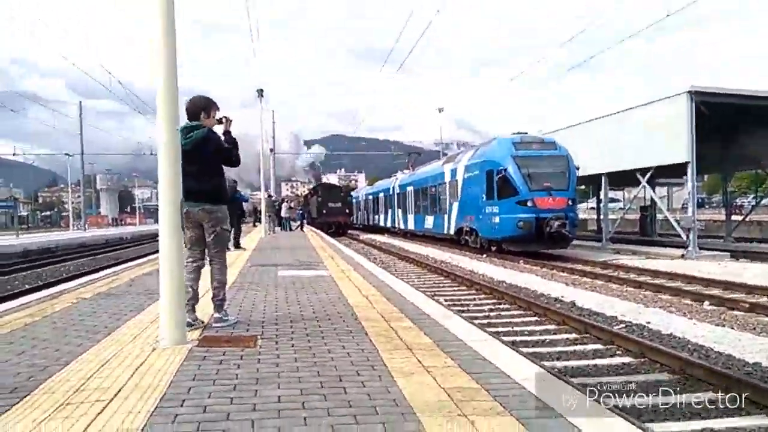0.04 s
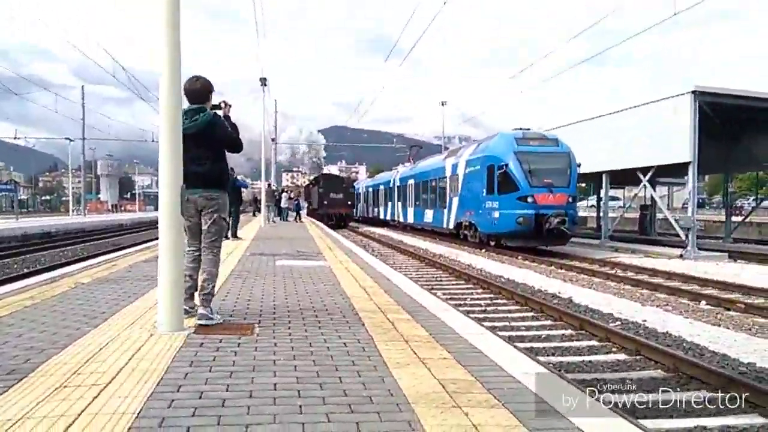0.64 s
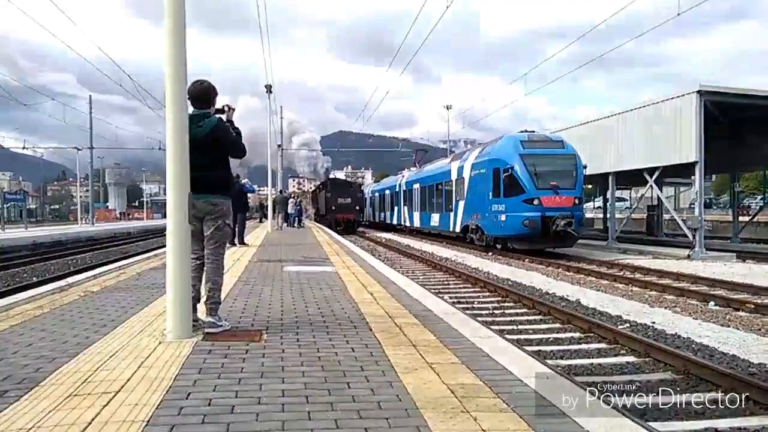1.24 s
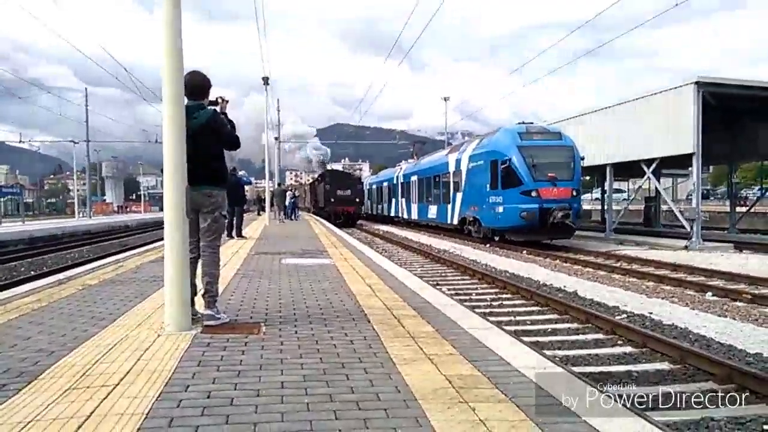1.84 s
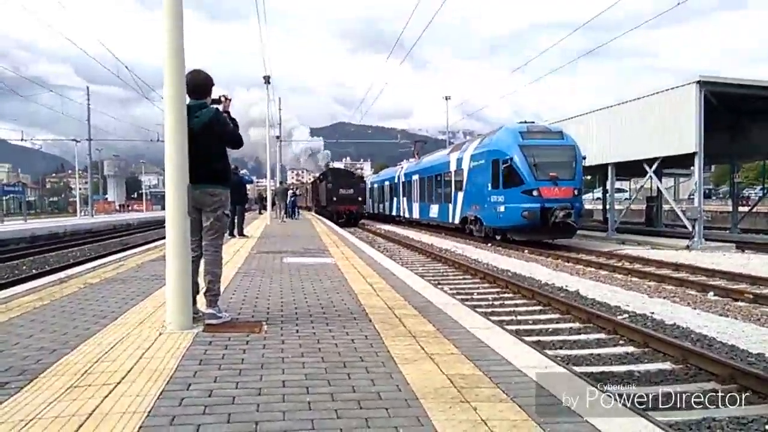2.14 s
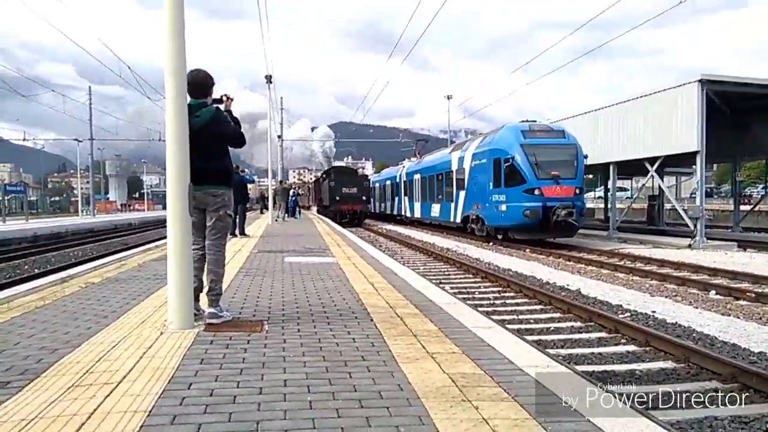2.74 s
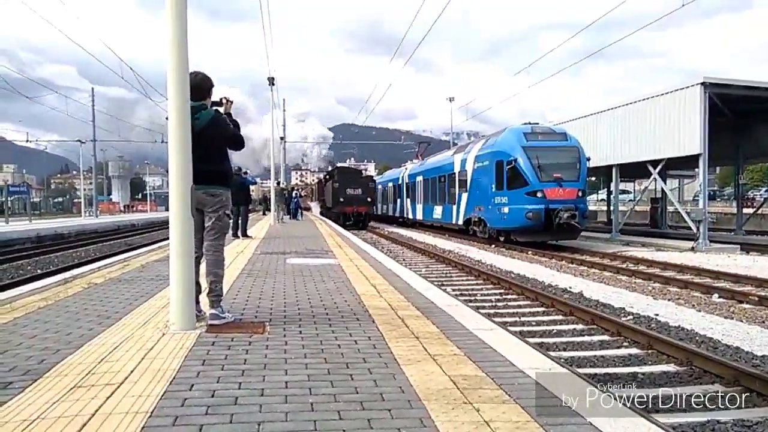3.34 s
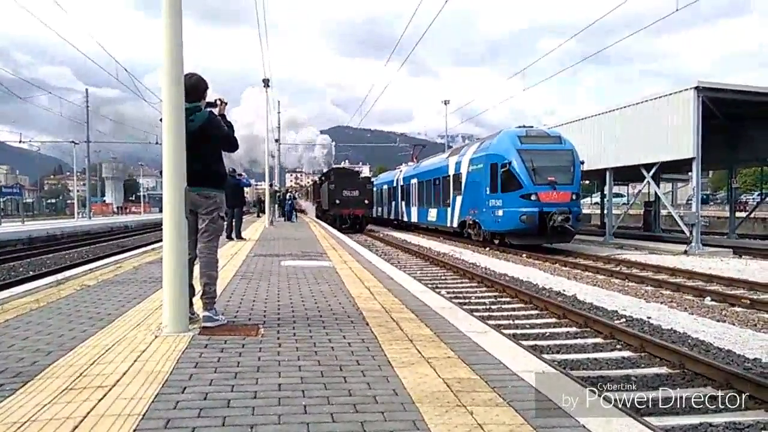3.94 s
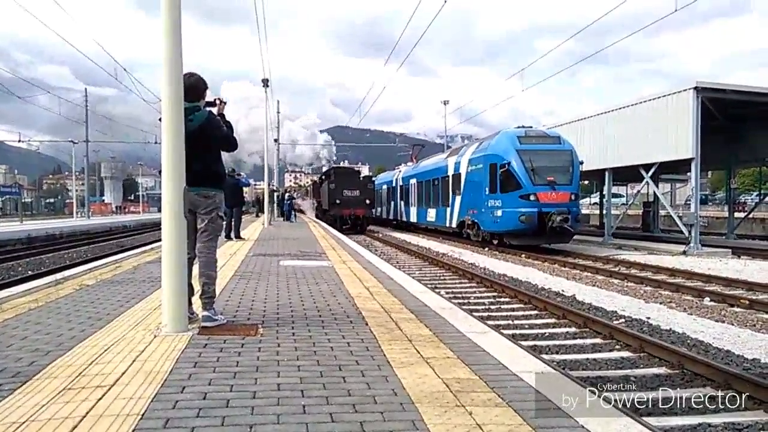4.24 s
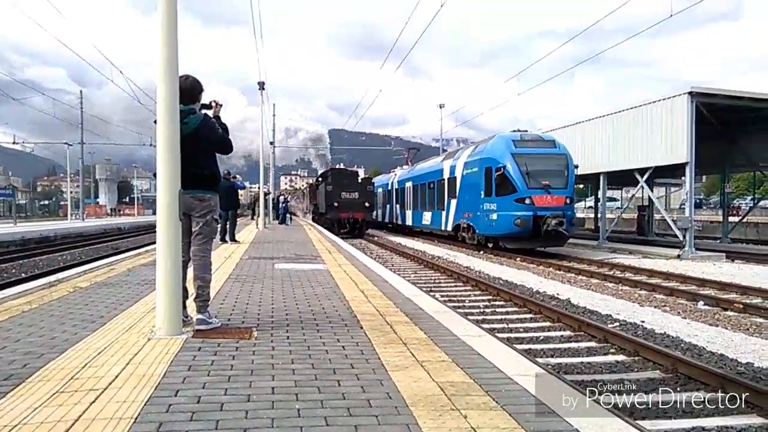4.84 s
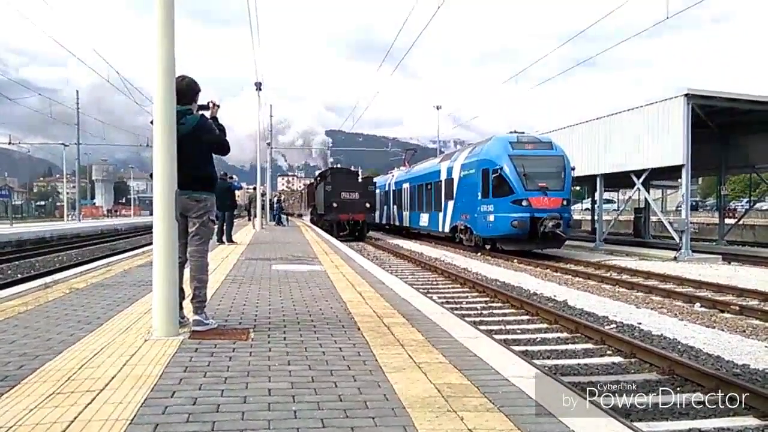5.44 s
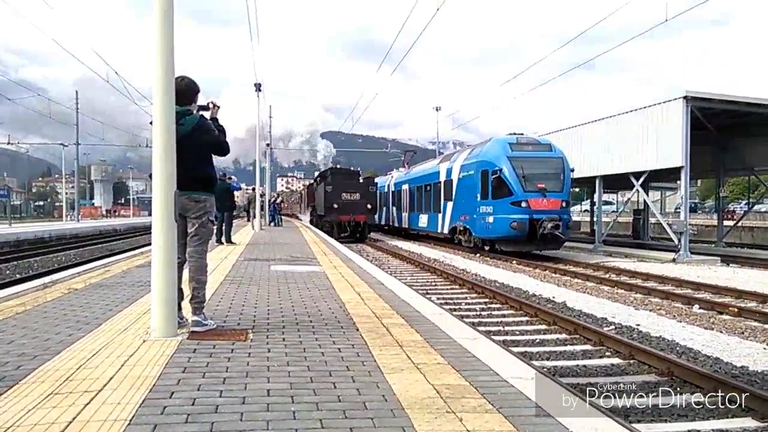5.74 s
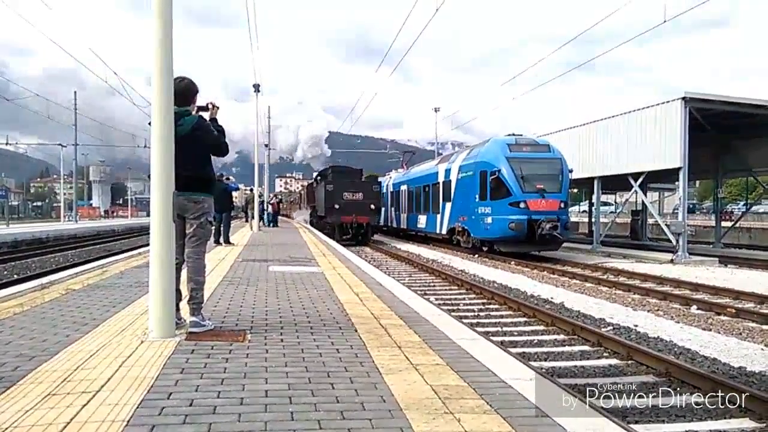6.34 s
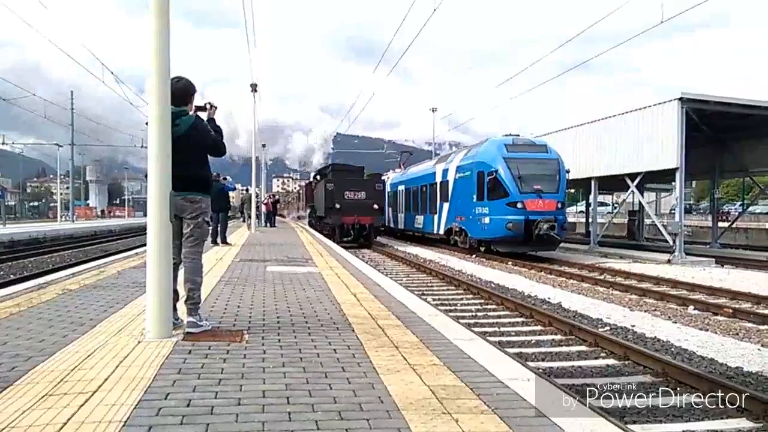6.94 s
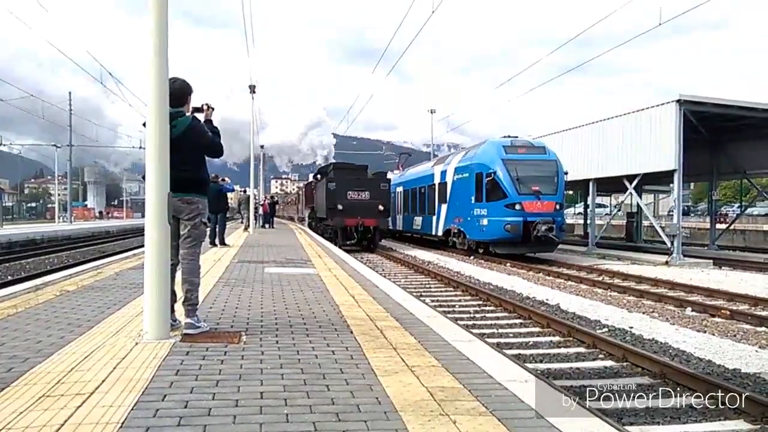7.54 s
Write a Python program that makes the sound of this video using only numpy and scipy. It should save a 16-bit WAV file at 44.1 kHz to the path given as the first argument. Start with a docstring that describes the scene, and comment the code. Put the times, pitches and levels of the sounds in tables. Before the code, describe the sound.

A steam locomotive chuffs some way off, its booming, hissing beats slowly quickening over a low rumble of wheels.

```python
"""Steam locomotive pulling along a platform

Some way off, the engine's beat slowly quickens. Each puff of exhaust booms in the chimney, barks,
and ends in a hiss of steam that dies away over the station. Steam spurts from the cylinders,
sliding parts scrape, rods clank and wheels rumble. Behind it the yard hums; close by, something
ticks. A limiter (an automatic volume control) flattens the loudest beats."""
import sys
import numpy as np
from scipy import signal
from scipy.fft import rfft, irfft, next_fast_len
from scipy.io import wavfile
from scipy.ndimage import uniform_filter1d, minimum_filter1d

SR = 44100
rng = np.random.default_rng(int(sys.argv[2]) if len(sys.argv) > 2 else 0)


def store_wav(level_fs):
    """Save 16-bit WAV to argv[1]."""
    pcm = np.round(np.clip(np.atleast_2d(level_fs), -1, 1) * 32767)
    wavfile.write(sys.argv[1], SR, pcm.T.astype(np.int16))


N = 339129
TIME = np.arange(N) / SR

# exhaust beats, four to a wheel turn: (time [s], valve open [s], strength [dB],
# rasp compared with strength [dB], jet [dB], sizzle compared with jet [dB])
BEATS = [(0.015, .06, -34.6, -23, -63, -8), (0.514, .089, -33.0, -13.5, -63.3, -4.5),
         (1.015, .075, -28.8, -13.5, -60, -3.5), (1.464, .067, -29.6, -16.2, -56.6, -6.5),
         (1.918, .055, -32.2, -18.5, -61.7, -8), (2.384, .06, -29.0, -26, -57.7, -5),
         (2.815, .105, -29.3, -18, -52, -5.5), (3.23, .064, -29.1, -18, -48.5, -6.5),
         (3.635, .058, -31.1, -22.5, -61.3, -4.5), (4.062, .075, -29.3, -18.5, -55, -5),
         (4.449, .098, -28.3, -17.3, -53, -1.5), (4.832, .105, -29.4, -19.5, -48.5, -7),
         (5.213, .038, -29.0, -18, -55.2, -5.5), (5.602, .059, -29.0, -17.5, -51.3, -2.5),
         (5.963, .092, -28.3, -18.3, -50.7, -2), (6.337, .075, -27.4, -23, -48.5, -1.5),
         (6.675, .05, -29.2, -15, -56.3, -2), (7.046, .062, -27.7, -13.5, -47.7, -.5),
         (7.392, .08, -26.5, -16, -47.8, -1)]
# tone of the yard, the wheels and the jet's sizzle: (frequency [Hz], level [dB])
YARD_SPECTRUM = [(30, -2), (150, -2), (300, -7), (430, -4), (560, -10), (750, -8), (950, -16), (1700, -25),
                 (2400, -24), (4800, -31), (6500, -39), (8000, -54), (15000, -57)]
RUMBLE_SPECTRUM = [(15, -20), (30, -13), (45, -3), (57, 1), (80, -2), (105, -5), (150, -16), (230, -28),
                   (500, -45), (1500, -80)]
SIZZLE_SPECTRUM = [(2500, -30), (3600, -4), (4700, .5), (5400, 0), (6200, -4), (7000, -10.5), (7450, -22),
                   (7900, -39), (9000, -35), (10200, -58)]
# a faint, very high fizz with each beat: (frequency [Hz], level [dB])
FIZZ_SPECTRUM = [(4500, -20), (6000, -3), (7000, 0), (7900, -18), (9000, -11), (9700, -25), (10300, -46),
                 (11200, -35), (12000, -23), (13200, -44), (15000, -54)]
# the rolling rumble as the engine nears: (time [s], level [dB])
ROLLING_LEVELS = [(0.0, -58), (6.38, -50), (6.57, -47), (7.69, -50)]
# rumble under each of the four piston strokes of a turn: (level compared with strength [dB])
STROKE_DB = [-13.5, -17, -21, -18]
# short, high spits of steam: (time [s], length [s], level [dB])
STEAM_SPITS = [(0, .15, -68), (.525, .03, -67), (1.13, .27, -65), (3.24, .05, -59), (6.35, .06, -49.5)]

# A mode is a pitch at which something likes to ring. All are (pitch [Hz], width [Hz], level [dB]).
# steam slipping past the opening valve
SLIP_MODES = [(405, 70, 0), (500, 90, -9)]
# air in the chimney and the smokebox (the chamber below it), from low to high
THUMP_MODES = [(68, 34, 0), (110, 34, -1.5)]
BOOM_MODES = [(147, 34, -1.5), (175, 36, 0)]
RING_MODES = [(192, 26, 0)]
BARK_MODES = [(274, 28, 0), (350, 90, -4), (398, 50, -2), (428, 46, 1.5), (515, 110, -8)]
THROAT_MODES = [(625, 120, -6.5), (715, 70, -.5), (765, 64, 0), (845, 80, -7.5)]
RASP_MODES = [(1000, 110, -3), (1135, 110, 0), (1240, 110, -2), (1470, 260, -12.5)]
# the blast pipe, which aims the steam up the chimney
BLAST_PIPE_MODES = [(1600, 260, -3.5), (1960, 145, 2.3), (2190, 300, -.5), (2600, 260, .5),
                    (2980, 175, -1.5), (3480, 290, -1.2), (4050, 700, -7.5), (4700, 500, -10)]
# steam leaving the cylinders
SPIT_MODES = [(4500, 800, -3), (5500, 900, 0)]
LEAK_MODES = [(2550, 300, -14), (3590, 220, -2.5), (4050, 190, -3), (4400, 800, -7), (4670, 140, 0),
              (4860, 160, -2)]
# sliding metal parts
SCRAPE_MODES = [(1220, 200, -6), (1520, 160, -8), (1960, 90, 1), (2380, 260, 0), (2620, 140, -1),
                (2980, 140, -4)]
GRIND_MODES = [(425, 80, 0), (780, 140, 0), (960, 160, -2), (1200, 200, -6), (1500, 240, -10)]

# how each sound swells and fades: (lag [s], rise [s], fall [dB/s], echo tail [dB], tail fall [dB/s])
STROKE_SHAPE = (.015, .01, 160, -22, 60)
SLIP_SHAPE = (-.012, .006, 260, -30, 120)
BOOM_SHAPE = (.009, .0055, 180, -19.5, 58)
RING_SHAPE = (.055, .015, 130, -17, 60)
BARK_SHAPE = (.007, .009, 150, -15, 52)
THROAT_SHAPE = (.018, .009, 130, -16, 38)
RASP_SHAPE = (.029, .008, 140, -14.5, 36)
CREST_SHAPE = (.033, .006, 330, -40, 200)
HISS_SHAPE = (.003, .016, 98, -16.5, 60)
SIZZLE_SHAPE = (.012, .015, 77, -14.5, 58)
FIZZ_SHAPE = (.024, .011, 190, -17, 60)
SCRAPE_SHAPE = (0., .008, 150, -20, 60)
LEAK_SHAPE = (0., .01, 150, -24, 65)

# chirping ticks close by: (time [s], peak [dB], first pitch [Hz], last pitch [Hz], decay [s])
NEAR_TICKS = [(.1327, -20.5, 6100, 4000, .0008), (.1328, -31, 2900, 2100, .0005),
              (1.6895, -35.5, 4700, 6000, .0018)]
# the scrape after each of the four beats of a turn: (level [dB])
SCRAPE_DB = [-77, -68, -66, -65]
# the cylinder's leak on each wheel turn: (level [dB])
LEAK_DB = [-69.5, -57.5, -52, -60.5, -64]
# knocks of rods and couplings: (time [s], level [dB], brightness [dB per octave])
ROD_KNOCKS = [(1.053, -43, -3), (1.353, -39, -3), (1.477, -46, 3), (1.983, -49, 0), (2.076, -50, 5),
              (2.431, -33, -12), (4.85, -44, 0), (5.25, -44, -4), (6.17, -39, -12), (6.75, -40, -4)]
# tones of a struck rod: (pitch [Hz], level [dB], time to fade by 60 dB [s])
ROD_TONES = [(1168, -9, .06), (1920, 0, .05), (2040, -6, .06), (2480, -13, .05), (3420, -12, .05),
             (3962, -5, .04), (4300, -10, .03)]
# echoes off the ground, the train's side and the platform roof: (delay [s], level [dB])
STATION_ECHOES = [(.0235, -17), (.0586, -18), (.097, -20)]


def from_db(db):
    """Turn decibels into a number to multiply by."""
    return np.exp(np.asarray(db) * (np.log(10) / 20))


def rms_one(x):
    """Scale a signal so that its average size (rms) is 1."""
    return x / np.sqrt(np.mean(x ** 2) + 1e-20)


def flutter(depth_db, rate):
    """A random wobble in volume, changing about rate times a second."""
    step, warm_up = 40, 2000  # samples per step; steps thrown away
    r = np.exp(-2 * np.pi * step * rate / SR)
    noise = rng.standard_normal(N // step + warm_up + 2)
    drift = rms_one(signal.lfilter([1], [1, -2 * r, r * r], noise)[warm_up:])
    return np.repeat(from_db(depth_db * drift), step)[:N]


def coloured(spectrum):
    """Steady noise with the given balance of low and high frequencies."""
    hz, db = np.transpose(spectrum)
    size = next_fast_len(N, True)
    bins = np.maximum(np.fft.rfftfreq(size, 1 / SR), 1)
    gain = from_db(np.interp(np.log(bins), np.log(hz), db))
    return rms_one(irfft(rfft(rng.standard_normal(size)) * gain, size)[:N])


def resonant(modes, sputter_db=0):
    """Noise rings at each mode's pitch; sputter makes each one surge on its own."""
    out, warm_up = 0, SR // 4
    noise = rng.standard_normal(N + warm_up)
    for hz, width, db in modes:
        r = np.exp(-np.pi * width / SR)
        band = [(1 - r * r) / 2, 0, (r * r - 1) / 2, 1, -2 * r * np.cos(2 * np.pi * hz / SR), r * r]
        ringing = signal.sosfilt([band, band], np.roll(noise, rng.integers(N)))[warm_up:]
        out = out + from_db(db) * ringing * flutter(sputter_db, rate=20)
    return rms_one(out)


def evened(x, share):
    """Steady a noise's loudness, as happens when a resonance is driven to its limit."""
    height = np.abs(signal.hilbert(x, next_fast_len(N))[:N])
    return rms_one(x / (height + .2) ** share)


def puffs(starts, lengths, levels_db, shape):
    """A volume curve of bursts: each swells, holds, then falls into a tail of outdoor echo."""
    lag, rise, fall, tail_db, tail_fall = shape
    coarse_time = TIME[::64]
    age = coarse_time - starts[:, None] - lag
    since_shut = np.maximum(age - lengths[:, None], 0)
    swell = (.5 + .5 * np.tanh(age / (2 * rise))) * from_db(levels_db)[:, None]
    fade_power = from_db(-fall * since_shut) ** 2 + from_db(tail_db - tail_fall * since_shut) ** 2
    return np.interp(TIME, coarse_time, np.sqrt(np.sum(fade_power * swell ** 2, axis=0)))


def beat_times():
    """The start of each beat and the gap to the next, in seconds."""
    start = np.transpose(BEATS)[0]
    gaps = np.diff(start)
    return start, np.append(gaps, gaps[-1])


def each_turn(values):
    """Repeat the values of one wheel turn over all the beats."""
    return np.resize(values, len(BEATS))


def yard():
    """The railway yard hums with a faint, steady noise."""
    return from_db(-60.5) * coloured(YARD_SPECTRUM)


def wheels():
    """The engine's weight rumbles unevenly on the rails, harder under each piston stroke."""
    start, length, strength_db = np.transpose(BEATS)[:3]
    rolling_db = np.interp(TIME, *np.transpose(ROLLING_LEVELS)) + 1.2
    rolling = from_db(rolling_db) * flutter(depth_db=2.2, rate=14)
    strokes = puffs(start, length, strength_db + each_turn(STROKE_DB), STROKE_SHAPE)
    return np.hypot(rolling, strokes) * evened(coloured(RUMBLE_SPECTRUM), share=.5)


def cylinder_spits():
    """Now and then the cylinders spit a little steam."""
    return resonant(SPIT_MODES, sputter_db=2.5) * puffs(*np.transpose(STEAM_SPITS), LEAK_SHAPE)


def exhaust():
    """Each blast of steam sets the air in the chimney booming; brighter jet noise builds after it."""
    start, length, strength_db, rasp_db = np.transpose(BEATS)[:4]
    ones = np.ones(len(start))

    def blast(relative_db, shape, seconds=length):
        return puffs(start, seconds, strength_db + relative_db, shape)

    # a little steam slips past the valve just before the blast
    slip = resonant(SLIP_MODES, sputter_db=1.5) * blast(-16.3, SLIP_SHAPE, seconds=.03 * ones)
    chimney_air = evened(resonant(BOOM_MODES), share=.8)
    thump = from_db(-13.5) * resonant(THUMP_MODES)
    boom = (from_db(-.7) * chimney_air + thump) * blast(0, BOOM_SHAPE)
    bark_db = -11.5 + .25 * start  # harder as the engine gathers speed
    bark = resonant(BARK_MODES, sputter_db=1.8) * blast(bark_db, BARK_SHAPE)
    throat = resonant(THROAT_MODES, sputter_db=2.2) * blast(-13.6, THROAT_SHAPE)
    rasp = resonant(RASP_MODES, sputter_db=2.5) * blast(rasp_db - .2, RASP_SHAPE)
    smokebox_ring = resonant(RING_MODES) * blast(-13, RING_SHAPE)
    # the pressure peaks briefly as the valve opens wide
    crest = 1 + .35 * puffs(start, .012 * ones, np.zeros(len(start)), CREST_SHAPE)
    # the jet flutters, and the chimney's air squeezes it on every swing
    squeeze = flutter(depth_db=1, rate=25) * (1 + .12 * chimney_air)
    return slip + smokebox_ring + (boom + bark + throat) * crest + (rasp + jet_and_fizz()) * squeeze


def jet_and_fizz():
    """Steam hisses out of the blast pipe. A faint, very high fizz is also heard with each beat."""
    beat, valve_open, _, _, jet_db, bright_db = np.transpose(BEATS)
    # later and shorter as the engine gathers speed
    start = beat + .021 + .0033 * beat
    length = valve_open + .04 - .007 * beat
    sizzle_db = jet_db + bright_db
    hiss = resonant(BLAST_PIPE_MODES, sputter_db=2.8) * puffs(start, length, jet_db + .8, HISS_SHAPE)
    sizzle = coloured(SIZZLE_SPECTRUM) * puffs(start, length, sizzle_db, SIZZLE_SHAPE)
    fizz = coloured(FIZZ_SPECTRUM) * puffs(start, length, sizzle_db - 11, FIZZ_SHAPE)
    return hiss + sizzle + fizz


def ticks(glide_s=.0018):
    """Tiny ticks close by, each a few vibrations that slide in pitch."""
    out, age = np.zeros(N), TIME[:SR // 20]
    for start, peak_db, first_hz, last_hz, decay in NEAR_TICKS:
        hz = last_hz + (first_hz - last_hz) * np.exp(-age / glide_s)
        height = age / decay * np.exp(1 - age / decay)
        at = round(start * SR)
        out[at:at + len(age)] += from_db(peak_db) * height * np.sin(2 * np.pi * np.cumsum(hz) / SR)
    return out


def sliding_parts(grind_lag_s=.06):
    """The parts that drive the wheels scrape between beats; a duller grinding follows each scrape."""
    beat, gap = beat_times()
    start, length, level_db = beat + .52 * gap, .3 * gap, each_turn(SCRAPE_DB)
    scrape = resonant(SCRAPE_MODES, sputter_db=3.5) * puffs(start, length, level_db, SCRAPE_SHAPE)
    grind_volume = puffs(start + grind_lag_s, length, level_db + 4, SCRAPE_SHAPE)
    grind = resonant(GRIND_MODES, sputter_db=3) * grind_volume
    return (scrape + grind) * flutter(depth_db=2.5, rate=35)


def cylinder_leak():
    """Once per wheel turn, steam leaks from one cylinder with a half-whistling hiss."""
    beat, gap = np.array(beat_times())[:, 1::4]  # the second beat of every four
    return resonant(LEAK_MODES, sputter_db=3) * puffs(beat + .44 * gap, .76 * gap, LEAK_DB, LEAK_SHAPE)


def rods(contact_s=.006):
    """Loose bearings knock; each knock is a short grinding contact that makes the rod ring."""
    out, age = np.zeros(N), TIME[:SR // 8]
    hz, tone_db, fade_s = np.transpose(ROD_TONES)[:, :, None]
    tones = from_db(tone_db - 60 * age / fade_s) * np.sin(2 * np.pi * hz * age)
    for start, level_db, bright_db in ROD_KNOCKS:
        contact = np.exp(-age / contact_s) * rng.standard_normal(len(age))
        ring = np.sum(from_db(bright_db * np.log2(hz / 2000)) * tones, axis=0)
        knock = signal.fftconvolve(contact, ring)[:len(age)]
        at = round(start * SR)
        out[at:at + len(age)] += from_db(level_db) * knock / np.abs(knock).max()
    # distance takes away the highest frequencies
    return signal.sosfilt(signal.butter(6, 6000, fs=SR, output="sos"), out)


def station(x):
    """A few hard surfaces send the sound back, a little duller."""
    dull = signal.sosfilt(signal.butter(1, 4000, fs=SR, output="sos"), x)
    echoes = (from_db(db) * np.interp(TIME - delay, TIME, dull, left=0) for delay, db in STATION_ECHOES)
    return x + sum(echoes)


def scene():
    """The engine in the station over the hum of the yard, in one channel."""
    engine = cylinder_spits() + exhaust() + sliding_parts() + cylinder_leak() + rods()
    return (yard() + wheels() + station(engine) + ticks())[None]


def limiter(x, ceiling_db, release_db_per_s):
    """The volume drops just ahead of each loud peak and comes back steadily."""
    over_db = np.maximum(20 * np.log10(np.abs(x).max(axis=0) + 1e-9) - ceiling_db, 0)
    recovery_db = release_db_per_s * TIME
    cut_db = np.maximum.accumulate(over_db + recovery_db) - recovery_db
    early_gain_db = minimum_filter1d(-cut_db, size=129)
    return x * from_db(uniform_filter1d(early_gain_db, size=129))


def record(dry):
    """The loudest beats are held down and the very highest treble is cut."""
    held = limiter(dry, ceiling_db=-19.8, release_db_per_s=150)
    return signal.sosfilt(signal.cheby2(12, 70, 15500, fs=SR, output="sos"), held)


dry = scene()
out = record(dry)
store_wav(out)
```